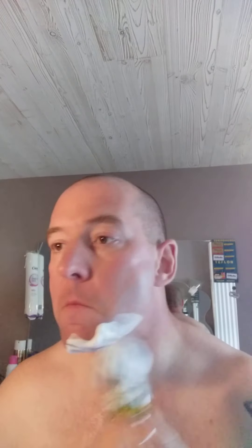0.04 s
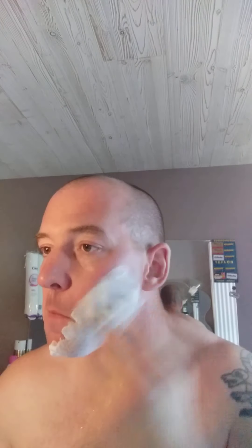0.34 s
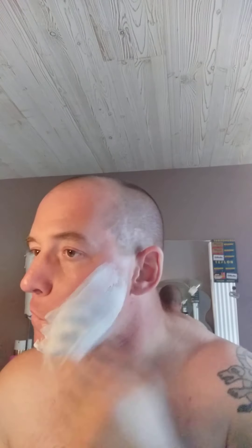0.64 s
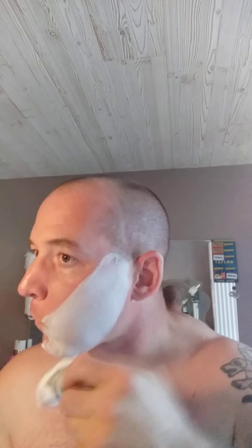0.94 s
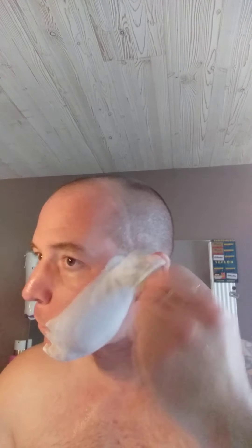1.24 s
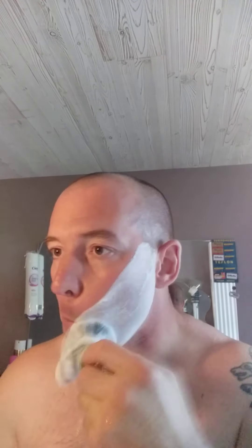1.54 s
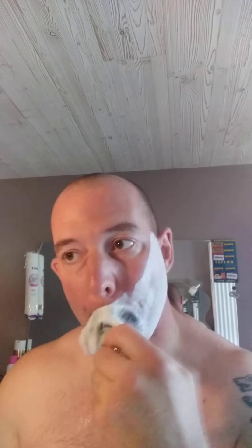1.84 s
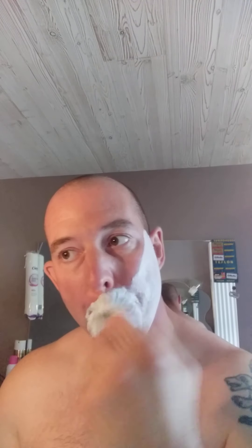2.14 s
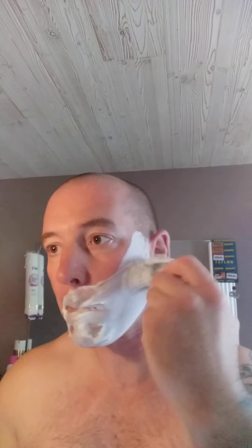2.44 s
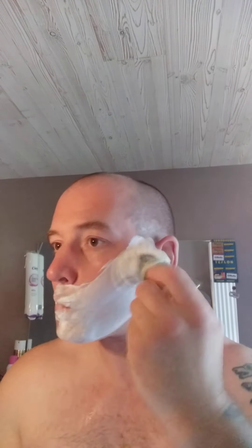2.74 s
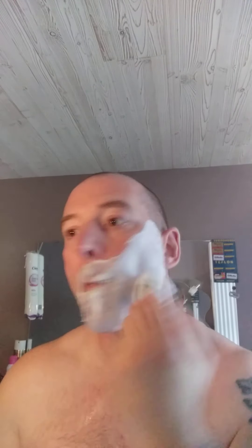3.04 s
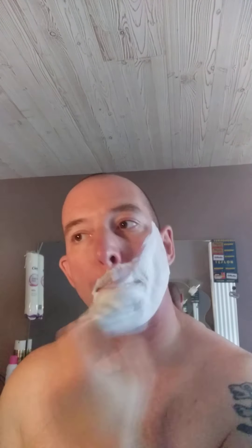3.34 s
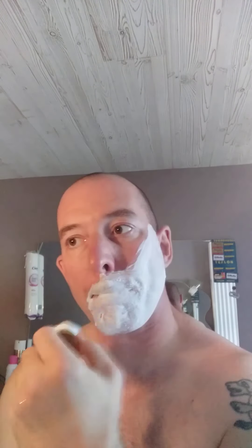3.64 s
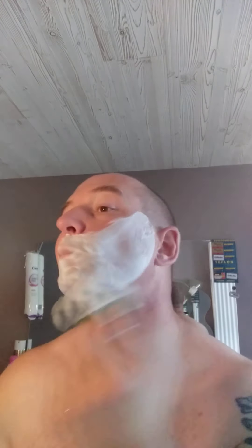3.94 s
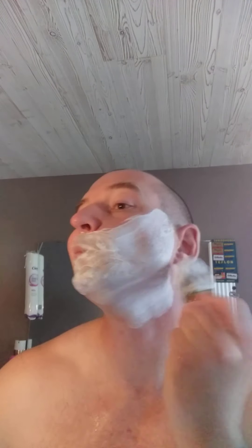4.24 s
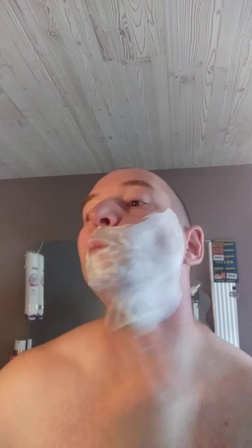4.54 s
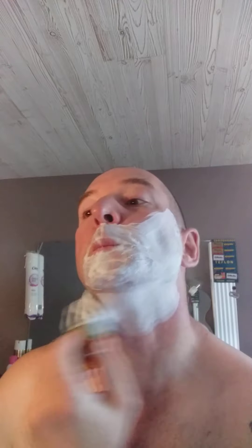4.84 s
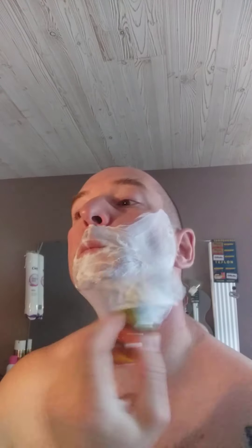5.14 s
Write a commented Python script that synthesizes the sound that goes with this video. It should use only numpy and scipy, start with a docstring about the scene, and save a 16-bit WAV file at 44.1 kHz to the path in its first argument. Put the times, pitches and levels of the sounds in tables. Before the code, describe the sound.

Quick bristly swishes and foamy squelches of a shaving brush lathering a stubbly face, dotted with soft smacks and pops.

```python
"""A wet shaving brush works lather over a stubbly cheek, chin and neck in quick strokes.
Bristles flick over the stubble; foam squelches, fizzes and pops. At the turns the soaked knot slaps
the skin and squeezes out a pocket of air, and the cheek thuds under a firm push.
A small bathroom answers; a faint rumble and hiss lie underneath, picked up almost in mono."""
import sys
import numpy as np
from scipy import signal
from scipy.fft import rfft, irfft, next_fast_len
from scipy.io import wavfile
from scipy.ndimage import uniform_filter1d, map_coordinates

SR = 44100
rng = np.random.default_rng(int(sys.argv[2]) if len(sys.argv) > 2 else 0)


def store_wav(level_fs):
    """Save 16-bit WAV to argv[1]."""
    pcm = np.round(np.clip(np.atleast_2d(level_fs), -1, 1) * 32767)
    wavfile.write(sys.argv[1], SR, pcm.T.astype(np.int16))


N = 229299


def rubbing():
    """The moving brush drives bristles, foam and skin."""
    rub_db, squelch_db, fizz_db = strokes()
    tufts = amp(1.43 * wobble(rate_hz=130))  # bristles catch and let go in clumps
    flicks = bristles(rub_db, tufts)
    return flicks + fizz(fizz_db) + squelch(squelch_db, tufts) + skin(rub_db) + bubbles(rub_db)


# (time [s], rise [s], hold [s], level [dB], change over hold [dB], squelch re rub [dB], fizz re rub [dB])
STROKES = [ (0.0, 0.0018, 0.023, -61, -2, -15.5, -28), (0.163, 0.047, 0.074, -48, -5, -2.5, -17.5),
           (0.308, 0.031, 0.068, -49.5, 0, -5, -17), (0.458, .002, .1, -48, -5, -8.5, -18),
           (0.59, 0.0038, 0.081, -44, -8.5, -3.5, -20), (0.737, .004, 0.071, -57, 7.5, -10, -25),
           (0.846, 0.0025, 0.097, -44, -9, -3.5, -23), (0.962, 0.051, 0.058, -53.5, 3, -7, -28),
           (1.075, .002, .075, -43.5, -5, -9.5, -25), (1.193, .005, 0.063, -56, 4.5, -27, -28),
           (1.274, 0.037, .064, -36, -14.5, -6, -28), (1.385, 0.036, 0.013, -42, -3.5, -3, -28),
           (1.455, 0.044, 0.035, -40.5, -2, 2, -28), (1.548, 0.051, 0.007, -42, -1, 1, -26),
           (1.642, 0.0082, 0.042, -39, -4.5, -0.5, -23), (1.714, 0.038, 0.015, -49.5, -1, -2, -23),
           (1.789, 0.037, 0.036, -40.5, -9.5, 1, -28), (1.856, 0.038, 0.01, -43.5, 0.5, -0.5, -30),
           (1.934, 0.016, 0.019, -40, -0.5, -3.5, -29), (1.989, 0.026, 0.028, -47.5, -0.5, 3, -29),
           (2.059, 0.028, 0.055, -41.5, -8.5, -1, -28), (2.161, 0.006, 0.014, -42, -1, -2.5, -25),
           (2.199, 0.018, .055, -46.5, 9, 0.5, -32), (2.361, 0.019, 0.022, -50, 3, -1, -18),
           (2.419, 0.025, 0.013, -49.5, 1.5, -8.5, -22), (2.49, 0.0046, 0.089, -52, -7, -12, -25),
           (2.561, 0.0086, 0.01, -46.5, -3.5, 2, -28), (2.641, 0.0019, 0.17, -42.5, -17.5, -4.5, -22.5),
           (2.786, 0.0064, 0.13, -42.5, -15, -6, -26), (2.933, 0.0022, 0.086, -41.5, -10, -1, -36),
           (3.006, 0.063, 0.068, -47.5, 1, -3.5, -27), (3.142, 0.11, 0.025, -51.5, 0, -2, -28),
           (3.299, .003, 0.067, -53, 7.5, -3.5, -26), (3.43, 0.0025, 0.07, -49.5, 2, -6, -27),
           (3.537, 0.042, 0.034, -48, 3, -5, -25), (3.675, 0.0074, 0.066, -52, 1.5, -8, -28),
           (3.79, 0.034, 0.042, -47, -1.5, -6.5, -26), (3.921, 0.037, 0.032, -53.5, 1, -7.5, -29),
           (4.027, .003, 0.09, -52.5, 5.5, -13, -25), (4.159, .009, .028, -52, -3.5, -18, -24),
           (4.263, .001, 0.082, -54.5, 8, -6.5, -26), (4.385, 0.053, 0.15, -52.5, 3, -0.5, -32),
           (4.621, .004, 0.061, -50, 0.5, 0, -25), (4.74, 0.0027, 0.074, -52, 1.5, -4.5, -22),
           (4.867, .003, 0.064, -49.5, -3.5, 2.5, -21), (4.988, 0.011, 0.072, -51, 1, -8, -25),
           (5.099, 0.0036, 0.072, -57, 6.5, -1.5, -22)]


def strokes(release_db_per_s=441, trail_db=-69, trail_wet_db=-5.5, trail_from_s=0.17):
    """Strokes rise, hold under changing pressure and die away; gives rub, squelch and fizz drive in dB."""
    t = np.arange(N) / SR
    trailing = amp(trail_db) * (t > trail_from_s)  # tips stay in the foam between strokes
    power = np.outer([1, amp(trail_wet_db), 0], trailing) ** 2 + 1e-12
    for time_s, rise_s, hold_s, db, change_db, wet_db, fizz_db in STROKES:
        start = round(time_s * SR)
        span = slice(start, start + SR // 2)
        age_s = t[span] - t[start]
        attack = np.sin(np.pi / 2 * np.clip(age_s / rise_s, 0, 1) ** 1.2)
        progress = np.clip((age_s - rise_s) / hold_s, 0, 1)
        release_db = release_db_per_s * np.maximum(age_s - rise_s - hold_s, 0)
        level = attack * amp(db + change_db * progress - release_db)
        power[:, span] += np.outer(amp([0, wet_db, fizz_db]), level) ** 2
    return 10 * np.log10(power)


# Bristle spectrum, also of the ticks: (frequency [Hz], level [dB])
BRISTLE_SPECTRUM = [(500, -22.5), (900, -15), (1250, -18), (1700, -2.5), (2200, -2), (2800, -2), (3600, 0),
                    (4700, -2.5), (6000, -5), (7000, -11.5), (8600, -30), (15800, -41.5)]
# Brightness from brush angle: (time [s], treble boost and bass cut [dB])
BRISTLE_TILT = [(0.3, 4), (0.6, 3), (1.35, 0), (1.65, 0.5), (2.2, 0), (2.5, 0), (3.1, -1), (3.6, 0.5),
                (4.1, 1.5), (4.45, 0), (5.0, 3)]


def bristles(rub_db, tufts, crossover_hz=3200):
    """Bristles flick over stubble; now and then a stiff one snaps free."""
    snaps = amp(-7.5) * grains(rate_hz=130, spread_db=4)
    impacts = tufts * grains(rate_hz=9000, spread_db=1.5) + snaps
    flicks = patchy(coloured(impacts, BRISTLE_SPECTRUM), depth_db=1.66)
    dull = signal.sosfiltfilt(signal.butter(2, crossover_hz, fs=SR, output="sos"), flicks)
    tilt_db = np.interp(np.arange(N) / SR, *np.transpose(BRISTLE_TILT))
    return amp(rub_db - 1) * (amp(-tilt_db) * dull + amp(tilt_db) * (flicks - dull))


# Wet foam: (frequency [Hz], level [dB])
SQUELCH_SPECTRUM = [(200, -26.5), (330, -10.5), (480, 0), (750, -1.5), (1100, -3.5), (1650, 3.5),
                    (2200, -4.5), (3300, -5), (6000, -17.5), (9000, -40.5)]


def squelch(drive_db, tufts):
    """Wet foam squelches between the tufts."""
    foam = coloured(tufts * grains(rate_hz=1200, spread_db=1.5), SQUELCH_SPECTRUM)
    return amp(drive_db - 3.5) * patchy(foam, depth_db=3.5)


# Fine foam: (frequency [Hz], level [dB])
FIZZ_SPECTRUM = [(5000, -20), (8000, -10), (9500, -6.5), (12000, 0.5), (15500, 1)]


def fizz(drive_db):
    """Stirred foam fizzes on for a moment."""
    return uniform_filter1d(amp(drive_db), size=2400, origin=650) * noise(FIZZ_SPECTRUM)


# Rubbed skin: (frequency [Hz], level [dB])
SKIN_SPECTRUM = [(40, -55.5), (80, -5), (120, 5), (200, -4), (300, 9), (480, -1.5), (750, -18), (1300, -25)]


def skin(rub_db):
    """The skin drums softly under the brush."""
    return amp(0.38 * rub_db - 55 + 3.14 * wobble(rate_hz=15)) * noise(SKIN_SPECTRUM)


def bubbles(rub_db, count=420):
    """Small bubbles break as the brush moves; each rings for a few cycles."""
    out, t = np.zeros(N), np.arange(SR // 40) / SR
    for when, height, softness in rng.random((count, 3)):
        hz = 320 * 14 ** height
        level_db = rub_db[int(when * N)] + 10.5 - 14 * softness + 3 * height
        add(out, when * N / SR, amp(level_db) * soft_ring(t, hz, width_hz=0.24 * hz))
    return out


# Knot landings: (time [s], level [dB], relative thump [dB], relative smack [dB], pocket pitch [Hz])
SLAPS = [(0.173, -33, -16, -12.5, 543), (0.33, -27, -26, -15, 444), (0.461, -30.5, -19, -15, 440),
         (0.609, -27, -14, -16.5, 444), (0.736, -49.5, -8, -23, 500), (0.848, -26.5, -20.5, -14, 524),
         (1.081, -19.5, -14, -10.5, 462), (1.198, -40.5, -14.5, -13, 458), (1.415, -25.5, -16, -27, 433),
         (1.605, -32, -15, -7.5, 486), (1.895, -27.5, -22.5, -5.5, 560), (1.95, -30.5, -21.5, -12, 525),
         (2.017, -39.5, -11.5, -9, 505), (2.089, -27.5, -13.5, -14, 547), (2.22, -33.5, -13.5, -6.5, 513),
         (2.271, -23, -17, -35, 517), (2.642, -31, -17.5, -7.5, 594), (2.814, -32, -11, -21, 448),
         (2.934, -21, -18, -12.5, 452), (2.985, -36, -13, -18, 327), (3.302, -34.5, -13.5, -14.5, 405),
         (3.432, -31, -22, -13.5, 460), (3.682, -44.5, -8, -21, 450), (3.789, -45.5, -14, -19, 410),
         (4.029, -43, -11.5, -28, 437), (4.263, -48.5, -5, -23, 560), (4.626, -30.5, -10.5, -15.5, 648),
         (4.741, -37, -16.5, -11, 507), (4.812, -40.5, -18, -6.5, 436), (4.871, -28, -15.5, -9, 480),
         (5.104, -33.5, -19.5, -14, 418)]
# Air pocket between knot and cheek: (frequency [x pitch], width [Hz], level [dB])
POCKET_MODES = [(.66, 114, -3.5), (.92, 127, 0), (1.33, 191, 2)]
# Wet smack: (frequency [Hz], level [dB])
SMACK_SPECTRUM = [(250, -42), (750, -3), (1100, 0.5), (1650, 18), (2400, 8.5), (3600, 6.5), (5500, 5.5),
                  (7200, -37), (9000, -53), (15000, -47)]


def slaps(slurp_t60_s=0.089, spatter_t60_s=0.022):
    """Each landing squeezes out a pocket of air: a hollow thump under a smack, then spatter."""
    out, t = np.zeros(N), np.arange(SR // 10) / SR
    for time_s, db, thump_db, smack_db, pitch_hz in SLAPS:
        pocket = np.zeros(len(t))
        for k, (ratio, width_hz, mode_db) in enumerate(POCKET_MODES):
            ring = soft_ring(t, ratio * pitch_hz, width_hz)
            pocket += (-1) ** k * amp(mode_db + rng.standard_normal()) * ring
        seep = 0.021 * amp(-0.55 * (db + 25))  # after a gentle landing air seeps out through the foam
        thump = signal.fftconvolve(burst(t, seep, slurp_t60_s), pocket)
        smack = signal.fftconvolve(burst(t, 0.15, spatter_t60_s), click(SMACK_SPECTRUM))
        onset_s = time_s + 0.001418  # thump and smack sound together, just after the listed time
        add(out, onset_s, amp(db + thump_db + 27.5) * thump / np.linalg.norm(thump))
        add(out, onset_s, amp(db + smack_db + 22.5) * smack / np.linalg.norm(smack))
    return out


# Sharp ticks: (time [s], level [dB])
TICKS = [(0.3322, -24.5), (0.4756, -26.5), (0.79, -31.5), (0.87, -22), (1.0938, -23.5), (1.529, -23.5),
         (2.0436, -23), (2.261, -25), (2.8145, -22.5), (4.0306, -38), (4.2635, -37.5), (4.3367, -30),
         (5.059, -29), (5.1762, -27.5)]


def ticks():
    """Sharp ticks with a brief noisy tail: foam popping, or the brush touching the skin."""
    out, t = np.zeros(N), np.arange(SR // 40) / SR
    for time_s, db in TICKS:
        tick = signal.fftconvolve(burst(t, tail_gain=0.16, t60_s=0.021), click(BRISTLE_SPECTRUM))
        add(out, time_s + 0.00106, amp(db - 2.5) * tick / np.abs(tick).max())
    return out


# Firm pushes: (time [s], level [dB])
THUDS = [(0.603, -55.5), (1.414, -44.5), (2.819, -55), (2.984, -58), (3.303, -59), (4.871, -50.5)]


def thuds():
    """The cheek gives under a push with a short low note."""
    out, t = np.zeros(N), np.arange(SR // 6) / SR
    for time_s, db in THUDS:
        add(out, time_s, amp(db + 16.5) * soft_ring(t, hz=131.6, width_hz=53))
    return out


# Reflection strength: (frequency [Hz], level [dB])
ROOM_SEND = [(100, -4.5), (500, 4.5), (1800, -4), (4000, -7), (14000, -1)]
# Reflection decay: (frequency [Hz], t60 [s])
ROOM_DECAY = [(150, 0.47), (500, 0.21), (2000, 0.41), (6000, 0.33), (14000, 0.57)]
# Standing waves: (frequency [Hz], level [dB], t60 [s])
ROOM_MODES = [(114, -6, 0.46), (168.3, 6.5, 0.26), (286, -5.5, .35), (393, -16.5, 0.14), (448.3, 6, 0.13),
              (494, 1.5, 0.2), (641, -9.5, 0.2), (740, -12, 0.35), (1572, 10, 0.028), (1690, -25, .3),
              (1880, 5.5, 0.1)]


def bathroom(x, tail_db, modes_db, segments=48):
    """Close walls give a short dense tail that shifts as the hand moves, over fixed standing waves."""
    t, out, hop = np.arange(SR // 2) / SR, np.zeros(N), N // segments
    for centre in range(0, N, hop):
        hz, age_s, bins = signal.stft(rng.standard_normal(len(t)), SR, nperseg=256)
        fade_db = along(ROOM_SEND, hz)[:, None] - 60 * age_s / along(ROOM_DECAY, hz)[:, None]
        tail = signal.istft(bins * amp(fade_db), SR, nperseg=256)[1][:len(t)]
        tail *= (1 + 0.76 * np.exp(-t / 0.028)) * (t > 0.002)  # strong first reflections
        crossfade = np.clip(1 - np.abs(np.arange(N) - centre) / hop, 0, 1)
        first = max(centre - hop, 0)
        piece = (x * np.sqrt(crossfade))[first:centre + hop]
        add(out, first / SR, signal.fftconvolve(piece, tail / np.linalg.norm(tail)))
    modes = sum(amp(db - 60 * t / t60_s) * np.cos(2 * np.pi * hz * t) for hz, db, t60_s in ROOM_MODES)
    ringing = signal.fftconvolve(x, modes / np.linalg.norm(modes))[:N]
    return amp(tail_db) * out + amp(modes_db) * ringing


# House rumble: (frequency [Hz], level [dB])
RUMBLE_SPECTRUM = [(20, -8), (40, -10), (65, -3.5), (95, 4), (120, 1.5), (170, -13), (350, -34.5),
                   (900, -31), (2500, -39)]
# Still room air: (frequency [Hz], level [dB])
AIR_SPECTRUM = [(300, -2.5), (1000, -5), (1400, -7), (3500, -5), (7000, -10), (9000, -21)]
# Microphone hiss: (frequency [Hz], level [dB])
HISS_SPECTRUM = [(500, -9), (2000, -19.5), (6000, -16), (8500, -1), (11000, 8), (13500, 3), (16000, 13)]


def background():
    """House rumble, still air, and microphone hiss that is partly each channel's own."""
    rumble = amp(-71.5) * noise(RUMBLE_SPECTRUM)
    air = amp(-76.5) * noise(AIR_SPECTRUM)
    shared, left, right = (noise(HISS_SPECTRUM) for _ in range(3))
    return rumble + air + amp(-81.5) * shared + amp(-75.5) * np.array([left, right])


def amp(db):
    """Decibels to gain."""
    return 10 ** (np.asarray(db) / 20)


def unit(x):
    """Scale to rms 1."""
    return x / np.sqrt(np.mean(x ** 2) + 1e-20)


def along(points, hz):
    """Interpolate (frequency [Hz], value) points on a log axis."""
    knots_hz, values = np.transpose(points)
    return np.interp(np.log(hz + 1), np.log(knots_hz), values)


def add(track, time_s, sound):
    """Mix a sound into the track."""
    start = round(time_s * SR)
    part = track[start:start + len(sound)]
    part += sound[:len(part)]


def wobble(rate_hz):
    """Smooth curve through random knots."""
    knots = rng.standard_normal(int(N * rate_hz / SR) + 4)
    return map_coordinates(knots, [np.arange(N) * rate_hz / SR])


def click(spectrum, size=4096):
    """Minimum-phase pulse with this spectrum."""
    magnitude = amp(along(spectrum, np.fft.rfftfreq(size, 1 / SR)))
    cepstrum = irfft(np.log(magnitude))
    cepstrum[1:size // 2] *= 2
    cepstrum[size // 2 + 1:] = 0
    return irfft(np.exp(rfft(cepstrum)))


def coloured(x, spectrum):
    """Filter by a spectrum, to rms 1."""
    return unit(signal.fftconvolve(x, click(spectrum))[:N])


def noise(spectrum):
    """Coloured noise, rms 1."""
    return coloured(rng.standard_normal(N), spectrum)


def grains(rate_hz, spread_db):
    """Impulses of random time, sign and size."""
    hit = rng.random(N) < rate_hz / SR
    size_db = spread_db * np.clip(rng.standard_normal(N), -2.5, 2.5)
    return unit(hit * rng.choice([-1, 1], N) * amp(size_db))


def burst(t, tail_gain, t60_s):
    """Unit impulse with a decaying noise tail."""
    out = tail_gain * rng.standard_normal(len(t)) * amp(-60 * t / t60_s)
    out[0] = 1
    return out


def soft_ring(t, hz, width_hz):
    """Resonance set off by a soft contact, without a click."""
    envelope = np.exp(-np.pi * width_hz * t) * (1 - np.exp(-t * hz)) ** 2
    return np.gradient(envelope * np.sin(2 * np.pi * hz * t)) * SR / (2 * np.pi * hz)


def patchy(x, depth_db):
    """Folds of foam open and close, so broad resonances come and go."""
    bins = signal.stft(x, nperseg=512)[2]
    field = rng.standard_normal(bins.shape)
    for _ in range(2):
        field = uniform_filter1d(uniform_filter1d(field, size=7, axis=0), size=4, axis=1)
    return unit(signal.istft(bins * amp(depth_db * unit(field)), nperseg=512)[1][:N])


def scene():
    """The brush, centred, in the bathroom."""
    brush = rubbing() + slaps() + thuds() + ticks()
    return amp(1.5) * brush + bathroom(brush, tail_db=-4.5, modes_db=-18.5) + background()


# Response at the microphone, thin in the bass: (frequency [Hz], gain [dB])
MIC_RESPONSE = [(20, -14), (50, -5.5), (90, 1), (170, 3), (205, 3.5), (270, 2), (600, -2.5), (16000, 0)]


def record(dry, cutoff_hz=15800):
    """Colour of the microphone position, then a hard band limit."""
    size = next_fast_len(N + SR // 2)
    heard = signal.fftconvolve(dry, click(MIC_RESPONSE)[None], axes=1)
    passband = np.fft.rfftfreq(size, 1 / SR) < cutoff_hz
    return irfft(rfft(heard, size) * passband, size)[:, :N]


dry = scene()
out = record(dry)
store_wav(out)
```